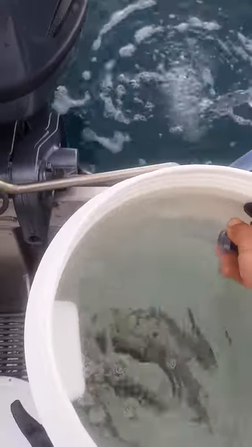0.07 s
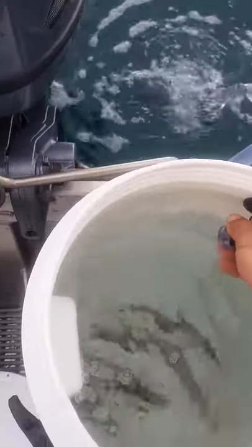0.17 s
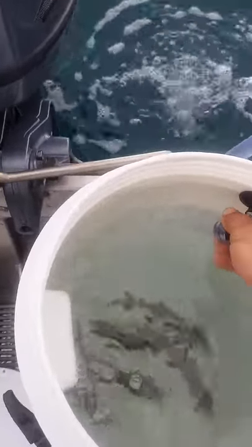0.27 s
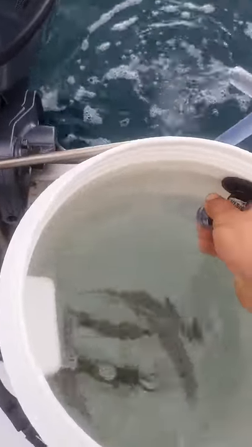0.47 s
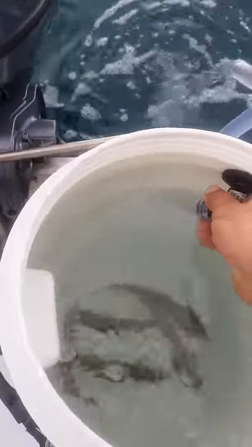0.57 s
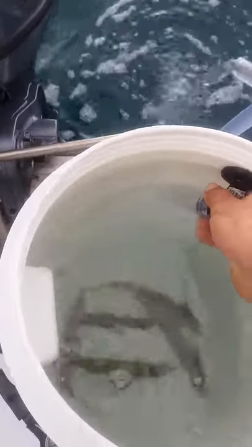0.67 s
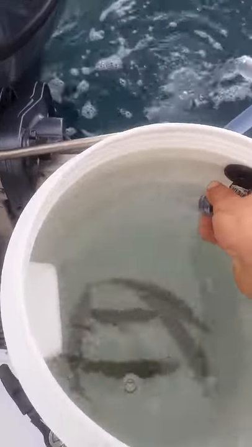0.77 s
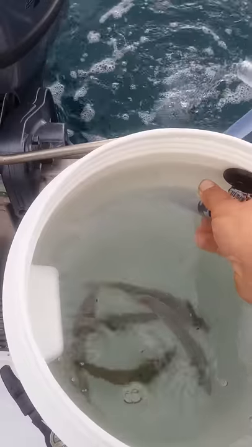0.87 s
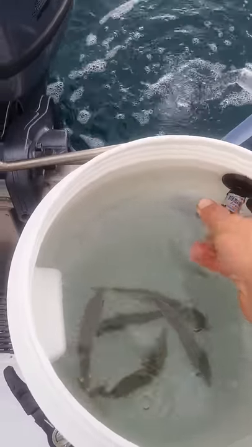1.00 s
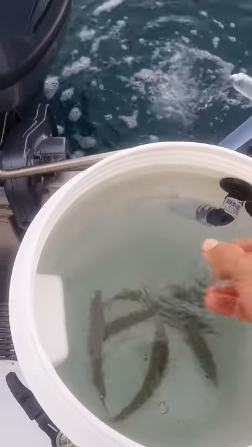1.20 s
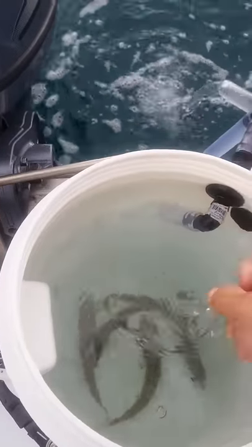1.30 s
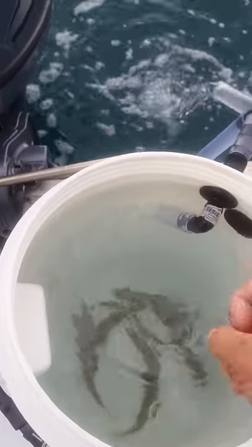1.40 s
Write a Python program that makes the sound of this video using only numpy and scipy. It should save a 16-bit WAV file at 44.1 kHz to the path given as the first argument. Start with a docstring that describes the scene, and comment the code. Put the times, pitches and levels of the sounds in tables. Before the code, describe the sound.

Water pours from a pump outlet into the sea beside a small boat, bubbling and pattering over a low slosh. Wind hits the microphone in two gusts with dull thumps, and one larger splash lands between them.

```python
"""A pump outlet pours into the sea beside a small boat. From the start the stream beats a thin patter of
bubbles, spray and drops over a low slosh, while wind flutters on the microphone. At about 0.25 s a gust
hits with dull thumps. At 0.4 s one larger splash slaps down and washes out over gurgling air pockets.
A second gust buffets the microphone around 1 s, then eases while the water patters on."""
import sys
import numpy as np
from scipy import signal
from scipy.fft import rfft, irfft
from scipy.io import wavfile
from scipy.ndimage import uniform_filter1d

SR = 44100
rng = np.random.default_rng(int(sys.argv[2]) if len(sys.argv) > 2 else 0)


def inscribe(sig):
    """Save sig as 16-bit PCM at rate SR to the path in sys.argv[1].

    A 1-D sig is mono; a 2-D sig holds one channel per row.
    Samples are clipped to [-1, 1] before scaling.
    """
    pcm = np.round(np.clip(np.atleast_2d(sig).T, -1, 1) * 32767)
    wavfile.write(sys.argv[1], SR, pcm.astype(np.int16))


N = 63945
T = np.arange(N) / SR
F = np.arange(N // 2 + 1) * SR / N + 0.0011  # Hz, offset to keep the log finite

# wind strength at the microphone: t/s, level/dB
GUST_ENVELOPE = [(0, -35.5), (.045, -29.5), (.095, -35.5), (.14, -29), (.18, -50), (.205, -27.5),
                 (.235, -21.5), (.265, -16), (.36, -15.5), (.41, -24.5), (.5, -26), (.58, -30.5),
                 (.64, -36.5), (.68, -28.5), (.735, -45), (.765, -21.5), (.79, -27.5), (.85, -22.5),
                 (.89, -18), (.955, -16), (.99, -29), (1.05, -14), (1.09, -29.5), (1.15, -29), (1.205, -41),
                 (1.24, -29.5), (1.28, -41.5), (1.45, -37)]
# tone of the wind's flutter: f/Hz, level/dB
FLUTTER_EQ = [(20, -37), (35, -21.5), (50, -5), (70, 1.5), (110, 0.5), (180, -5), (260, -16), (400, -25),
              (700, -47), (1500, -48), (3000, -89.5)]
# strength of the pour: t/s, level/dB
POUR_ENVELOPE = [(0, -42.5), (.08, -48), (.2, -49), (.4, -50), (.6, -46.5), (.72, -50.5), (.82, -47.5),
                 (1.0, -50.5), (1.2, -49.5), (1.45, -47.5)]
# tone of the stream's bubbles and spray: f/Hz, level/dB
STREAM_EQ = [(150, -17.5), (500, 5), (1000, -5.5), (1800, -8), (3000, -8.5), (4000, -12), (5600, -10),
             (7200, -16.5), (10000, -19.5), (12500, -26), (16000, -25)]
# swell of the churned water: t/s, level/dB
SLOSH_ENVELOPE = [(0, -39), (.1, -44.5), (.2, -55), (.45, -49.5), (.74, -40.5), (1.15, -57), (1.45, -67)]
# tone of the slosh: f/Hz, level/dB
SLOSH_EQ = [(120, -14), (230, 2), (400, 1), (750, -14.5), (1100, -12.5), (2500, -49)]
# drops that stand out: t/s, level/dB, f/Hz, length/s
DROPS = [(0, -64, 4900, 0.034), (0.054, -49, 1660, 0.053), (0.141, -42, 2560, 0.01),
         (0.151, -48.5, 5900, 0.012), (0.334, -47.5, 1450, 0.024), (0.341, -47.5, 2760, 0.026),
         (0.551, -47.5, 6000, 0.015), (0.633, -50.5, 2700, 0.023), (0.815, -49, 5600, 0.014),
         (0.823, -34, 2570, 0.0053), (1.205, -50, 4800, 0.038), (1.24, -45, 1320, 0.014),
         (1.326, -45.5, 5240, 0.012), (1.384, -46.5, 2250, 0.0097), (1.398, -45, 5360, 0.0068),
         (1.44, -47, 3270, 0.021)]
# single ringing bubbles: t/s, level/dB, f/Hz, decay/s
PLINKS = [(.008, -26.5, 227, 0.057), (.423, -33, 1016, 0.041), (.433, -27, 712, 0.025),
          (0.503, -25, 970, 0.015), (0.777, -29, 9600, 0.0019), (1.021, -48, 5300, 0.019),
          (1.367, -26, 1860, 0.0035)]
# fine droplets: t/s, level/dB
TICKS = [(.155, -55), (0.267, -52), (0.477, -47.5), (0.572, -50), (0.663, -47), (.844, -51.5),
         (1.331, -49.5), (1.37, -59)]
# strong eddies hitting the microphone: t/s, peak level/dB, f/Hz
THUMPS = [(0.233, -17, 318), (.248, -2.5, 454), (.255, -4, 292), (.267, -26.5, 740), (0.269, -1, 192),
          (0.287, -6.5, 285), (.294, -17, 537), (0.303, -9, 195), (0.318, -25, 202), (0.347, -11, 208),
          (.381, -13, 696), (.382, -3, 302), (0.467, -7, 185), (0.679, -22, 69), (0.761, -13, 177),
          (.866, -12, 277), (0.877, -4.5, 163), (0.905, -7.5, 226), (.924, -8.5, 322), (0.935, -6.5, 131),
          (.947, -8.5, 258), (0.965, -16, 91), (1.015, -13.5, 218), (1.036, -11.5, 171), (1.051, -6, 180),
          (1.062, -11, 253), (1.137, -12.5, 221), (1.152, -21.5, 57)]
# bursts of rough air: t/s, level/dB, half length/s
BLASTS = [(0.248, -21.5, 0.01), (0.286, -23, 0.022), (0.382, -22, 0.0068), (0.877, -20.5, 0.0032),
          (0.939, -31.5, 0.016), (1.052, -27.5, 0.0094)]
# tone of the rough air: f/Hz, level/dB
BLAST_EQ = [(60, -21.5), (160, 3.5), (300, -8.5), (500, 2), (800, -10), (1300, -30), (2000, -58),
            (4000, -79)]
# bands of the big splash: f/Hz, level/dB, hold/s, t60/s
SPLASH_BANDS = [(188, -30, 0.19, 0.26), (372, -31.5, .15, 0.3), (608, -36, 0.086, 0.44),
                (950, -40, 0.15, 0.26), (1623, -42.5, 0.14, 0.52), (2530, -44.5, 0.12, 0.17),
                (3840, -45.5, 0.049, 0.15), (5150, -49, 0.104, 0.11), (8340, -67, 0.097, 0.49),
                (13000, -81, .09, .4)]
# air pockets under the splash: f/Hz, width/share of f, level/dB
AIR_POCKETS = [(703, 0.012, -44.5), (1065, 0.12, -40.5)]
# surges of spray in the splash: t/s, level/dB, f/Hz, length/s
SPRAY_SURGES = [(0.415, -38.5, 4530, 0.021), (0.45, -60, 9400, 0.026), (0.485, -43, 5400, 0.027)]
# clouds of like-sized bubbles: t/s, level/dB, f/Hz, length/s
BUBBLE_CLOUDS = [(0.537, -38.5, 1660, 0.032), (1.02, -64, 5340, 0.21), (1.31, -51.5, 1810, 0.091)]

MIC_CUT_HZ, MIC_CUT_Q = 123.5, 2.77
EDDIES_PER_S, EDDY_HZ, EDDY_STEEPNESS = 90, 207, 1.78
BUBBLES_PER_S, BUBBLE_LOW_HZ, BUBBLE_HIGH_HZ = 830, 699.4, 6887
SPLASH_START_S, SPLASH_ATTACK_S, SPLASH_SAG_DB_PER_S, POCKET_T60_S = 0.413, 0.0038, 12.5, 1


def undb(db):
    """Decibels to gain."""
    return 10 ** (np.asarray(db) / 20)


def unit(x):
    """Scale to rms 1."""
    return x / (np.std(x) + 1e-12)


def envelope(rows):
    """A fader ride through t/s, level/dB points."""
    return undb(np.interp(T, *np.array(rows).T))


def eq(x, rows):
    """Shape the tone through f/Hz, level/dB points, to rms 1."""
    hz, db = np.array(rows).T
    return unit(irfft(rfft(x) * undb(np.interp(np.log(F), np.log(hz), db)), N))


def band(x, hz, width):
    """Band-pass to rms 1; width is a share of the centre frequency."""
    edges = np.minimum(hz * np.exp(np.array([-width, width]) / 2), [SR / 2 - 2000, SR / 2 - 1000])
    return unit(signal.sosfilt(signal.butter(2, edges, "band", fs=SR, output="sos"), x))


def eddy(hz):
    """Spectrum of one eddy of peak 1: a smooth push that swings back through the microphone's low cut."""
    push = F / hz * np.exp(-(F / hz) ** EDDY_STEEPNESS / EDDY_STEEPNESS)
    s = 1j * F / MIC_CUT_HZ
    spectrum = push * 1j * s ** 2 / (s ** 2 + s / MIC_CUT_Q + 1)
    return spectrum / np.abs(irfft(spectrum, N)).max()


def wind():
    """A low flutter rides the gusts; small eddies swell a little faster than it does."""
    gust = envelope(GUST_ENVELOPE)
    rumble = eq(rng.standard_normal(N), FLUTTER_EQ)
    rumble_rms = np.sqrt(uniform_filter1d(rumble ** 2, size=1100, mode="wrap"))
    flutter = eq(rumble / rumble_rms, [(1000, 0), (3000, -30)])  # levelled, then darkened
    kicks = (rng.random(N) < EDDIES_PER_S / SR) * rng.standard_normal(N)
    eddies = unit(irfft(rfft(kicks) * eddy(EDDY_HZ), N))
    eddy_swell = gust.max() * (gust / gust.max()) ** 1.1
    return gust * flutter + undb(-23) * eddy_swell * eddies


def patter(spread_db):
    """Countless tiny impacts of uneven size: noise in grains of random level."""
    return rng.standard_normal(N) * undb(spread_db * np.repeat(rng.standard_normal(N // 64 + 1), 64)[:N])


def bubble(age, hz, decay_s, glide):
    """A bubble rings down while its pitch rises."""
    fade = age / decay_s
    return np.sin(2 * np.pi * hz * age * (1 + glide * np.tanh(fade / 4) / 2)) * np.exp(-fade)


def stream():
    """The stream beats small bubbles into the sea under a fine spray."""
    bubbles, age = np.zeros(N + 4096), T[:4096]
    spray = eq(patter(spread_db=2.5), STREAM_EQ)
    for when, pitch, strength, ring in rng.random((int(BUBBLES_PER_S * N / SR), 4)):
        start = int(when * N)
        hz = BUBBLE_LOW_HZ * (BUBBLE_HIGH_HZ / BUBBLE_LOW_HZ) ** pitch
        decay_s = 11.5 * (0.53 + ring) / hz  # about 6 to 18 cycles
        accent_db = -3.5 * np.log(1 - 0.97 * strength)  # many soft, a few loud
        gain = undb(accent_db) * np.sqrt(hz / decay_s)
        bubbles[start:start + len(age)] += gain * bubble(age, hz, decay_s, glide=0.055)
    return envelope(POUR_ENVELOPE) * (undb(-6.5) * eq(bubbles[:N], STREAM_EQ) + undb(-3.5) * spray)


def slosh():
    """Churned water gurgles low beneath the stream."""
    return envelope(SLOSH_ENVELOPE) * eq(patter(spread_db=3.0), SLOSH_EQ)


def spatter(start, db, hz, length, width):
    """A quick cluster of tiny impacts that fades away."""
    age = np.maximum(T - start, 0)
    shape = np.minimum(age / 0.0027, 1) * np.exp(-(age / length) ** 2)
    return undb(db) * shape * band(patter(spread_db=-0.5), hz, width)


def drops():
    """Drops land in short spatters on top of the stream."""
    return sum(spatter(*row, width=0.27) for row in DROPS)


def plinks():
    """A few single bubbles ring out clearly."""
    out = 0
    for start, db, hz, decay_s in PLINKS:
        age = np.maximum(T - start, 0)
        attack = np.minimum(age / 0.0051, 1)
        out += undb(db) * attack * bubble(age, hz, decay_s, glide=0.0074)
    return out


def ticks():
    """Fine droplets tick, each a tiny bright burst."""
    return sum(spatter(start, db, hz=9500, length=0.0043, width=0.31) for start, db in TICKS)


def thumps():
    """Strong eddies hit the microphone, one dull thump each."""
    return irfft(sum(undb(db) * eddy(hz) * np.exp(-2j * np.pi * F * t) for t, db, hz in THUMPS), N)


def blasts():
    """The strongest wind breaks into brief, rough turbulence."""
    swells = sum(undb(db) * np.exp(-((T - t) / half) ** 2) for t, db, half in BLASTS)
    return swells * eq(rng.standard_normal(N), BLAST_EQ)


def splash():
    """A bright slap, then falling water that holds briefly and washes out over gurgling air pockets."""
    age, wash = np.maximum(T - SPLASH_START_S, 0), 0
    for hz, db, hold, t60 in SPLASH_BANDS:
        fall_db = SPLASH_SAG_DB_PER_S * age + np.maximum(age - hold, 0) * 60 / t60
        wash += undb(db - fall_db) * band(patter(spread_db=2.0), hz, width=0.41)
    gurgle = sum(undb(db) * band(rng.standard_normal(N), hz, width) for hz, width, db in AIR_POCKETS)
    gurgle *= undb(-60 * age / POCKET_T60_S)
    spray = sum(spatter(*row, width=0.44) for row in SPRAY_SURGES)
    return np.minimum(age / SPLASH_ATTACK_S, 1) * (wash + gurgle) + spray


def bubble_clouds():
    """Like-sized bubbles ring together as a narrow band of fizz."""
    return sum(spatter(*row, width=0.063) for row in BUBBLE_CLOUDS)


def scene():
    """Mono mix: wind on the microphone, water beside the boat."""
    air = wind() + thumps() + blasts()
    water = splash() + stream() + drops() + plinks() + bubble_clouds() + ticks() + slosh()
    return (air + water)[None]


def record(dry):
    """A gentle low cut at 30 Hz and a steep high cut at 16 kHz."""
    low_cut = signal.sosfilt(signal.butter(1, 30, "high", fs=SR, output="sos"), dry)
    return signal.sosfilt(signal.ellip(8, 0.2, 70, 16000, fs=SR, output="sos"), low_cut)


dry = scene()
out = record(dry)
inscribe(out)
```